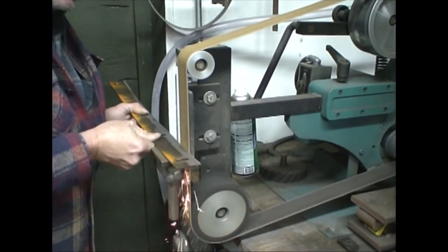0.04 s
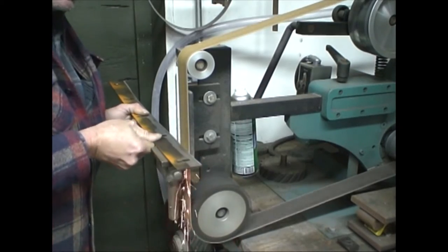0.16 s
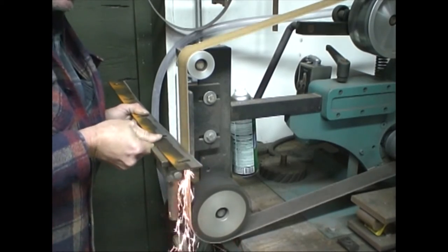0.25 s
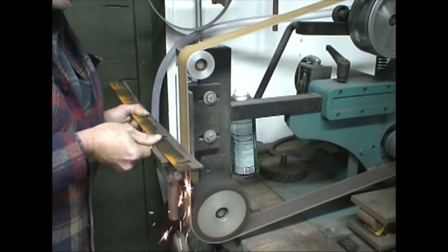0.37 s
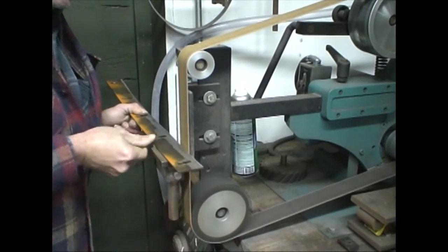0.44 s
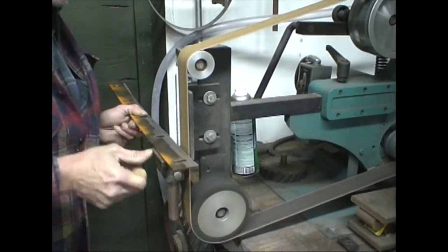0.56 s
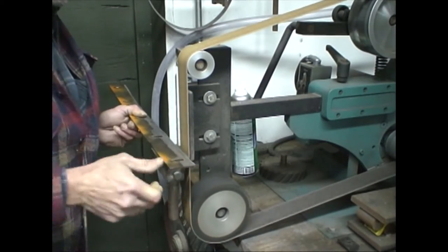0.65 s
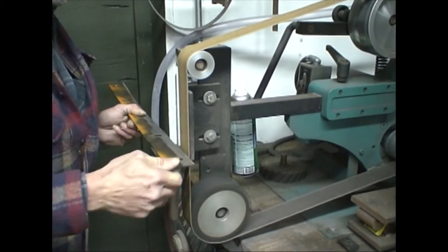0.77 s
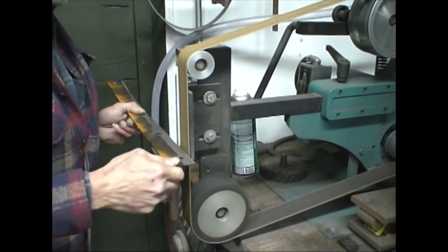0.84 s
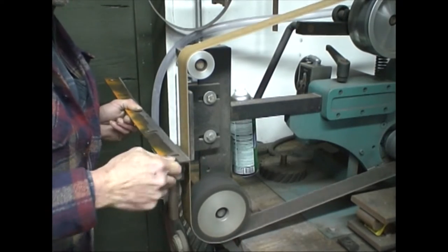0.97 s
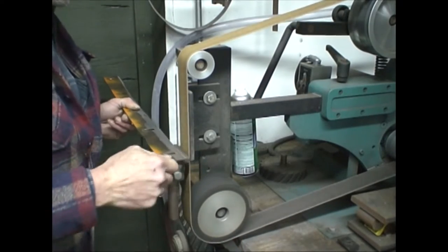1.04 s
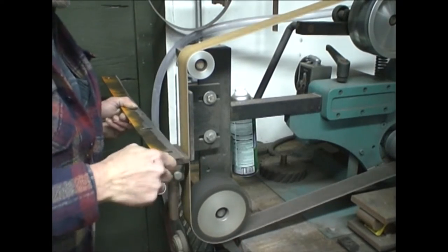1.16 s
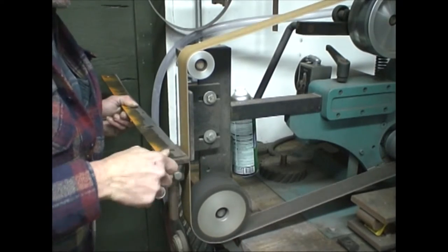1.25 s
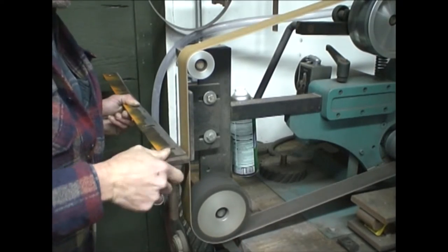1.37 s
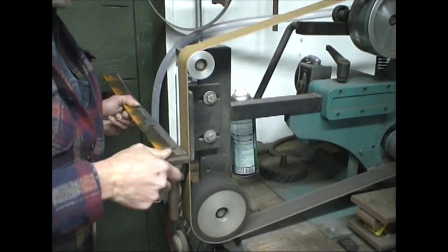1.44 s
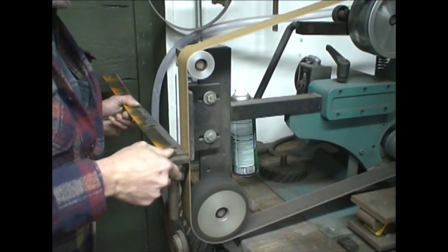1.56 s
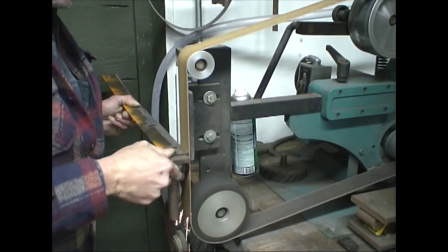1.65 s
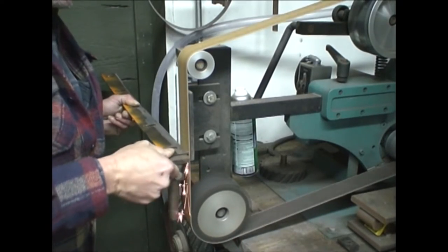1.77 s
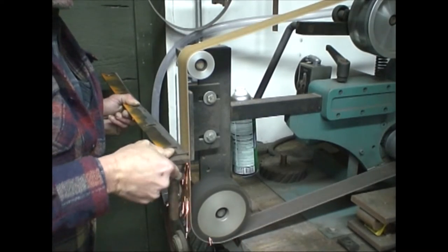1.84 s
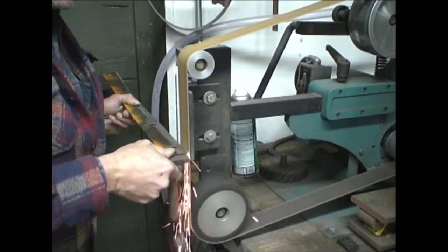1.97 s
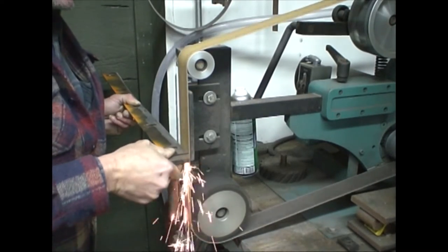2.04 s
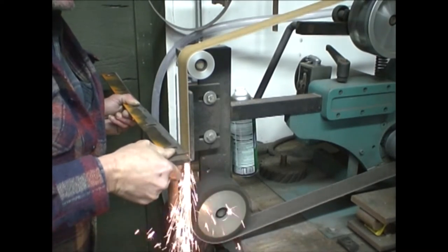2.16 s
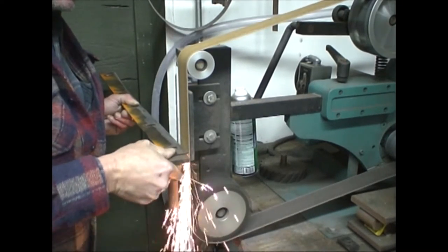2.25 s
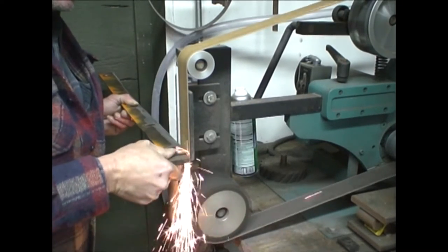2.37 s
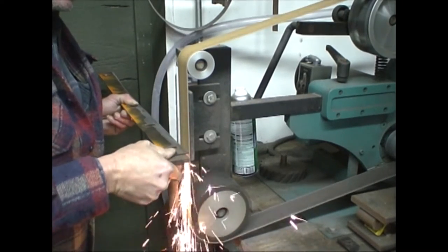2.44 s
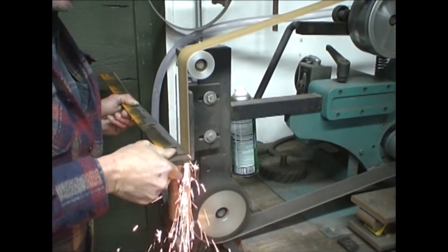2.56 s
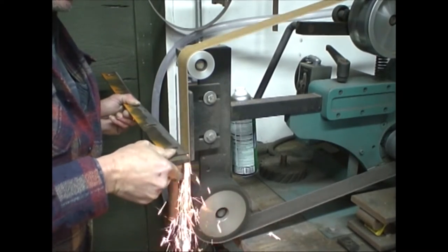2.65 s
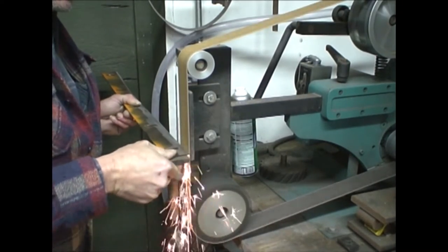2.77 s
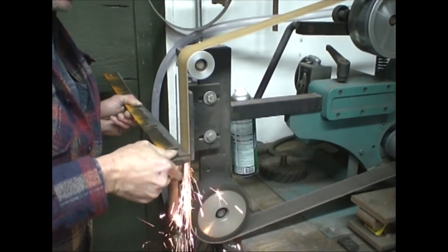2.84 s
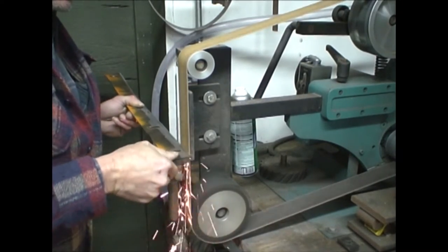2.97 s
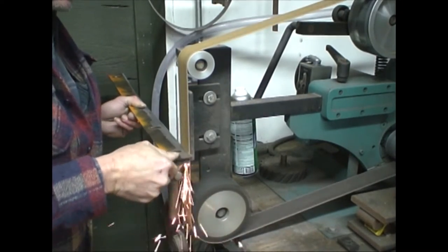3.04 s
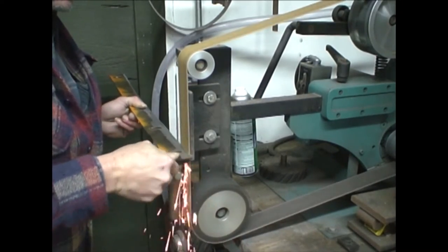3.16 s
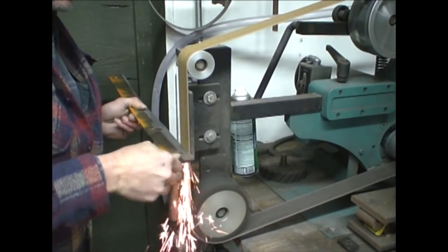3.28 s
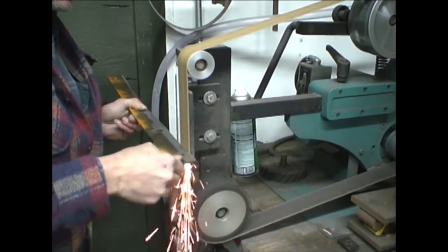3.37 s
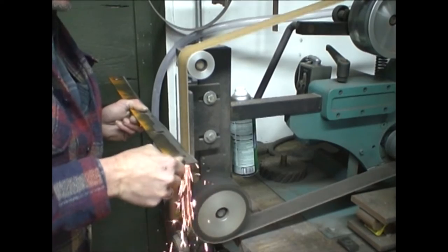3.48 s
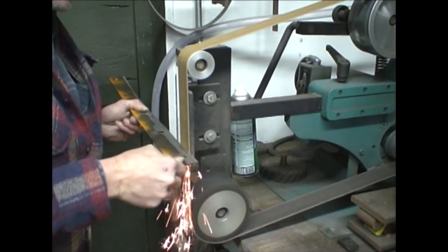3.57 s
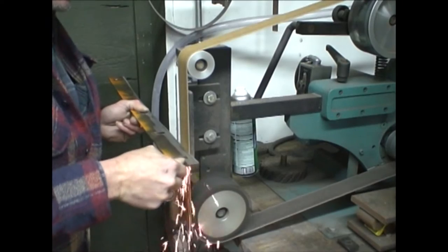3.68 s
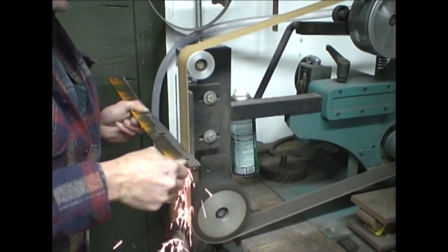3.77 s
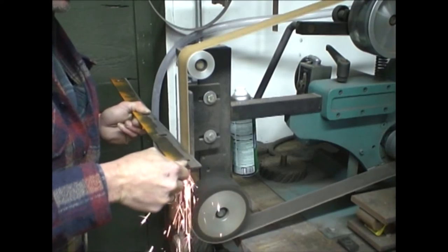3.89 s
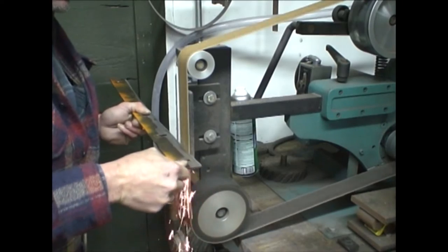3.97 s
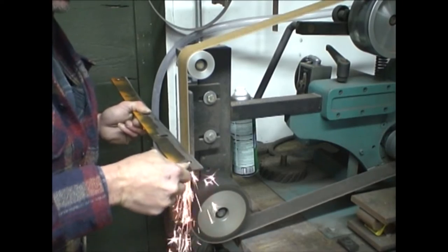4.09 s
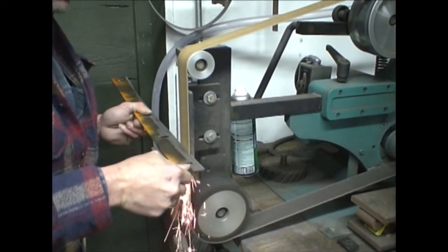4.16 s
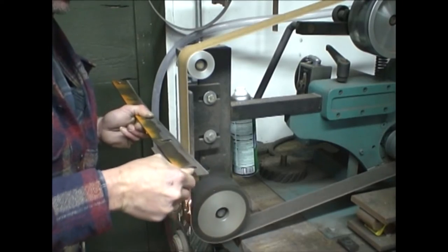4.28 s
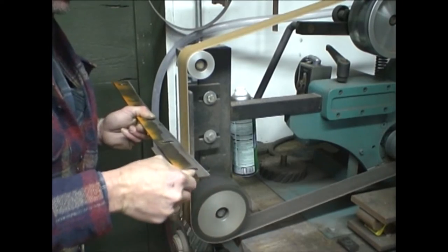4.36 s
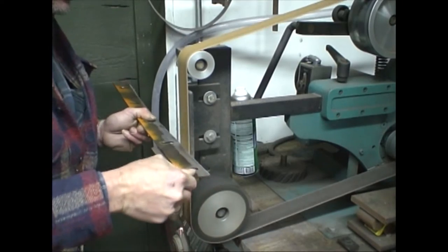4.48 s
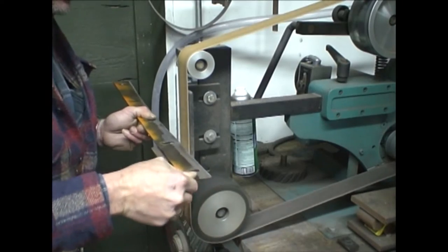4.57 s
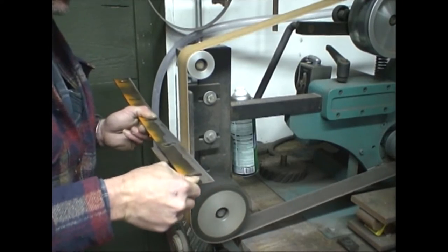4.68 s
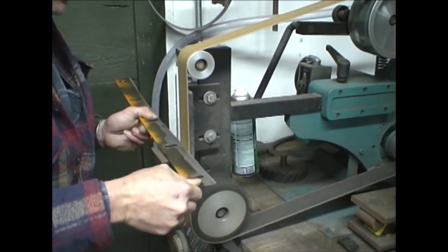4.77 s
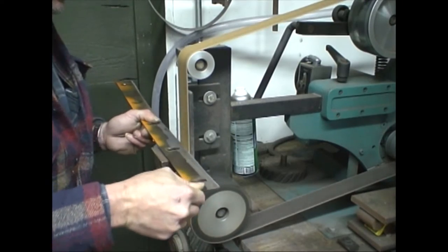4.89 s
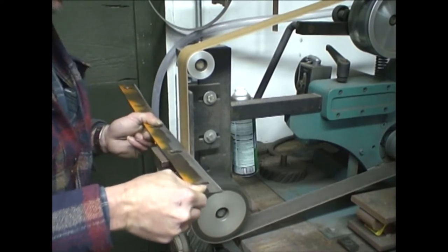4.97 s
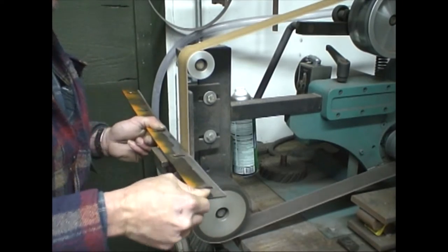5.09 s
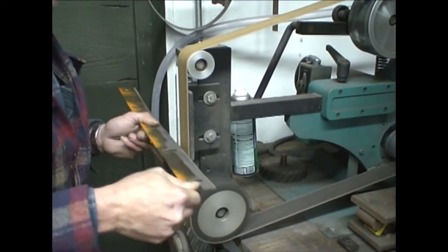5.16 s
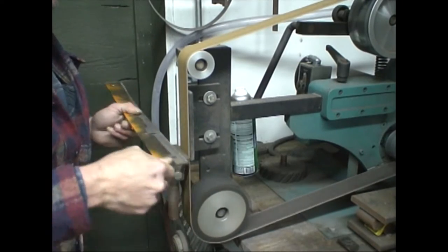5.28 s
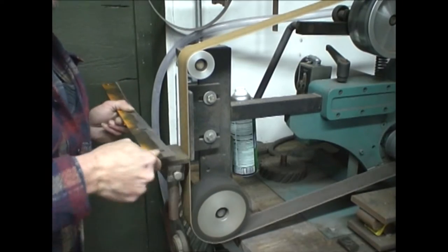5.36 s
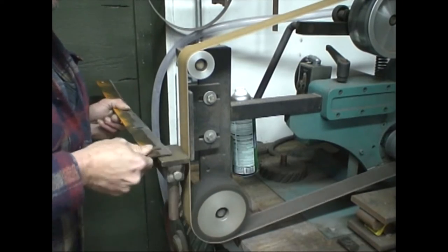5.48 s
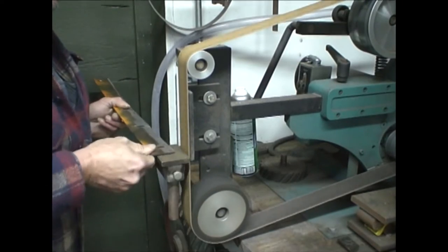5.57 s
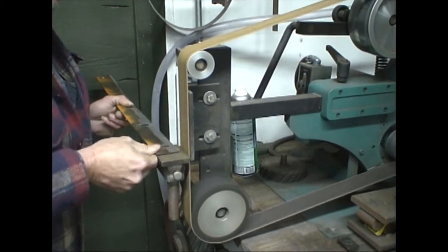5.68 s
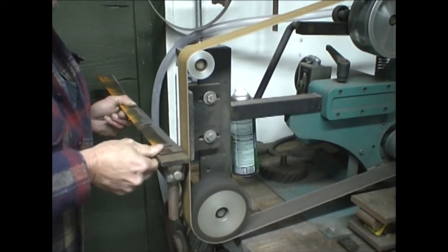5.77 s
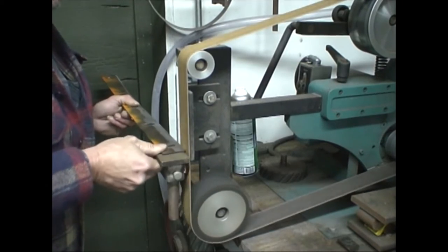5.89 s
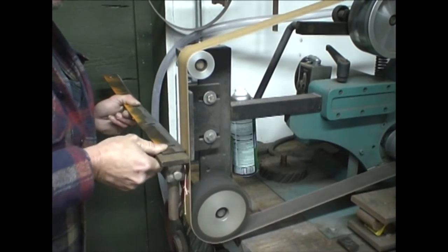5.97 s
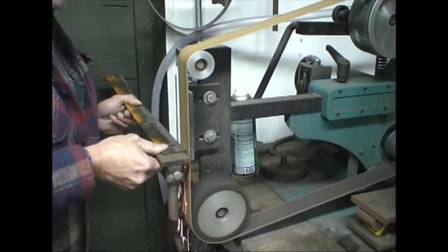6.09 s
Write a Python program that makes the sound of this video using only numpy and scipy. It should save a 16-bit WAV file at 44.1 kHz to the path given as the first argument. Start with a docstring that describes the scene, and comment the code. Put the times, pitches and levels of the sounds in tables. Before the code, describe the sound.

A belt grinder runs throughout in a small, hard-walled workshop: steady low mains hum, slightly wavering motor and bearing whines, and a broad rush of belt and wheels with a faint quick flutter. At 0 s steel is already grinding hard, a bright abrasive hiss with ringing metal, stopping near 0.45 s. The machine alone gradually swells back until about 1.6 s, when the blade touches with a brief chirping scrape. From 1.7 to 3 s the contact is light, a thin sizzle with singing tones that come and go. About 3.1 s it bites harder, dips near 3.4, then surges unevenly, becoming fierce and piercing from 4 to 5.1 s while the machine sinks behind it. It lifts at 5.15 s; the hum and rush recover. Around 5.9 s a softer grind begins, strengthening slightly and left unfinished. Close stereo microphone, short reverberant wash.

```python
"""In a small workshop a belt grinder runs: mains hum and bearing whines are wavering sines, and the rush
of belt and wheels is noise coloured by frame resonances. A steel blade is drawn across the belt three times,
the first pass already under way and the last unfinished: grit hisses as band noise and sets the blade's
modes singing as resonators, brighter the harder it is pressed. The walls return a short wash, and the
recorder's gain control makes the machine sink back under hard grinding."""
import sys
import numpy as np
from scipy import signal
from scipy.fft import rfft, irfft, next_fast_len
from scipy.io import wavfile
from scipy.ndimage import uniform_filter1d

SR = 44100
rng = np.random.default_rng(int(sys.argv[2]) if len(sys.argv) > 2 else 0)


def persist_wave(psi):
    """Save psi, clipped to +-1, as 16-bit WAV."""
    counts = np.round(np.clip(psi, -1, 1) * 32767).astype(np.int16)
    wavfile.write(sys.argv[1], SR, np.atleast_2d(counts).T)


N = 270333


def from_db(db):
    """Amplitude ratio: 20 dB for each factor of ten."""
    return 10 ** (np.asarray(db) / 20)


def rms_one(x):
    """Normalisation to unit root mean square."""
    return x / np.sqrt(np.mean(x ** 2) + 1e-20)


def in_time(rows):
    """Linear interpolation of table columns, one value a sample."""
    s, *columns = np.transpose(rows)
    return np.array([np.interp(np.arange(N) / SR, s, column) for column in columns])


def at_hz(points, hz):
    """Spectrum interpolated on a logarithmic frequency axis."""
    at, value = np.transpose(points)
    return np.interp(np.log(hz + 1), np.log(at + 1), value)


def drift(rate_hz):
    """Random fluctuation: noise slowed by two equal one-pole low-passes, rms 1."""
    step, run_in = 40, 2000   # samples, coarse steps
    r = np.exp(-2 * np.pi * step * rate_hz / SR)
    noise = rng.standard_normal(N // step + run_in + 2)
    slow = signal.lfilter([1], [1, -2 * r, r * r], noise)[run_in:]
    return np.interp(np.arange(N) / step, np.arange(len(slow)), rms_one(slow))


def spread(mid_side, side_table, lean_table):
    """Mid-side stereo: frequency sets the width and the level balance of left and right."""
    size = next_fast_len(N)
    hz = np.arange(size // 2 + 1) * SR / size
    mid, side = rfft(mid_side, size)
    side = side * from_db(at_hz(side_table, hz))
    lean = from_db(at_hz(lean_table, hz) / 2)   # half of the difference to each ear
    return irfft([(mid + side) * lean, (mid - side) / lean], size)[:, :N]


def belt_pattern(turns_per_s=7.63):
    """Periodic modulation: splice and worn patches come round with every turn of the belt."""
    turn = turns_per_s * np.arange(N) / SR
    patches = rng.standard_normal(32)
    return np.interp(turn % 1, np.linspace(0, 1, 33), np.append(patches, patches[0]))


def wavering_tone(hz, waver_hz):
    """Frequency modulation by chance: the more the pitch strays, the more the level flickers."""
    phase = 2 * np.pi * (hz * np.arange(N) + waver_hz * np.cumsum(drift(6.1))) / SR
    flicker = from_db(2.9 * np.tanh(waver_hz / 3) * drift(4.2))
    # mid, and a weaker side a quarter cycle away
    return np.sqrt(2) * flicker * np.array([np.sin(phase), 0.25 * np.cos(phase)])


def motor_and_bearings():
    """Rotating parts radiate line spectra: steady tones with slightly wandering pitch."""
    # pitches of motor and bearings: (frequency [Hz])
    tone_hz = [59.5, 120, 239, 418, 836, 1314, 1550, 2783, 3262, 3521, 4100, 4462, 4753, 4959]
    # each of these tones: (level re machine level [dB], rms pitch waver [Hz])
    tones = [(-23.5, 1.3), (-0.2, 0.041), (-18.5, 2.92), (-11, 3.05), (-12, 1.2), (-17, 7.65), (-17, 8.06),
             (-23, 8.4), (-16.5, 8.55), (-25, 8.6), (-19, 11.1), (-16.5, 8.8), (-22, 7.2), (-30, 7.3)]
    return sum(from_db(level_db) * wavering_tone(hz, waver_hz)
               for hz, (level_db, waver_hz) in zip(tone_hz, tones))


def belt_rush(belt, level_db=8):
    """Turbulence and friction give broadband noise, which the frame's resonances colour."""
    # noise of belt, wheels and fan: (frequency [Hz], relative spectral density [dB])
    rush_colour = [(20, -31), (45, -33), (90, -21.5), (130, -19), (160, -16.5), (364, -10), (900, -18.5),
                   (1900, -18), (3300, -16), (4800, -16.5), (7000, -18), (9000, -19.5), (13300, -18),
                   (16000, -25)]
    # resonances of frame and guards: (frequency [Hz], width [Hz], lift [dB])
    frame = [(188, 40, 4.5), (342, 22, 3.5), (677, 82, 4), (1244, 130, 4), (3440, 87, 3), (4810, 140, 5),
             (6250, 210, 1.5), (10200, 290, 1.5)]
    hz = np.arange(N // 2 + 1) * SR / N
    colour_db = at_hz(rush_colour, hz)
    for top_hz, width_hz, lift_db in frame:
        colour_db += lift_db / (1 + (2 * (hz - top_hz) / width_hz) ** 2)
    white = rfft(rng.standard_normal((2, N)))
    rush = rms_one(irfft(white * from_db(colour_db), N))
    return rush * from_db(level_db + 0.19 * belt + 0.46 * drift(24))


def machine(belt, machine_db=-32):
    """Superposition of line spectrum and broadband rush, at a steady running level."""
    # stereo width: (frequency [Hz], gain of the side signal [dB])
    machine_side = [(30, 0), (48, -4), (60, -11), (120, -8.5), (200, -17), (380, -12.5), (700, -7.5),
                    (1290, -8.5), (2380, -9), (4400, -5), (7000, -5), (10400, -3), (11300, -4),
                    (11800, -22), (16000, -30)]
    # stereo balance: (frequency [Hz], left re right [dB])
    machine_lean = [(60, -1.0), (110, -1), (200, -1.5), (380, -3.0), (700, -4.5), (1290, -3.0),
                    (2380, -0.5), (4400, -1.5), (8120, -2.5), (15000, -3)]
    both = motor_and_bearings() + belt_rush(belt)
    return from_db(machine_db) * spread(both, machine_side, machine_lean)


def contact(touch_s=0.039, lift_s=0.067):
    """Pressure drives the friction sound: hiss amplitude and ring levels, silent off the belt."""
    # each pass from touch to lift: (time [s], pressure as control level of the grit hiss [dB])
    passes = [
        [(-.2, -18), (0.05, -10.5), (0.2, -11.5), (0.33, -13.5), (0.452, -9)],
        [(1.575, -29), (1.65, -23), (1.7, -23), (1.85, -23), (2.0, -22), (2.17, -22), (2.3, -21.5), (2.5, -21),
         (2.6, -21), (2.8, -22), (2.95, -22), (3.08, -15.5), (3.2, -14), (3.38, -21.5), (3.47, -13),
         (3.58, -12.5), (3.7, -12), (3.75, -10), (3.79, -14), (3.83, -15), (3.87, -11.5), (4.0, -9),
         (4.12, -12), (4.24, -13), (4.42, -9.5), (4.55, -7), (4.66, -9), (4.78, -8.5), (4.9, -9.5), (5.0, -8.5),
         (5.06, -11.5), (5.142, -14)],
        [(5.88, -24), (6.0, -24.5), (6.13, -18.5), (6.3, -20)],
    ]
    # rings of heel, edge and tip: (level re hiss at middling pressure [dB], share of a pressure change followed)
    rings = [(-9.5, 0.027), (-5, 1), (-5, 1)]
    middling_db = -15
    heel_late_db, heel_settles_s = -14, 0.21   # the heel starts weak after each touch
    t, touch, late_db = np.arange(N) / SR, np.zeros(N), np.zeros(N)
    for rows in passes:
        on, off = rows[0][0], rows[-1][0]
        ramp = np.minimum((t - on) / touch_s, (off - t) / lift_s)
        touch += np.clip(ramp, 0, 1) ** 2
        if on > 0:
            late_db += heel_late_db * np.exp(-abs(t - on) / heel_settles_s) * (t > on)
    hiss_db, = in_time([row for rows in passes for row in rows])
    heel, edge, tip = [level_db + (follows - 1) * (hiss_db - middling_db) for level_db, follows in rings]
    # the fourth control is the hiss itself, 0 dB re hiss
    return touch * from_db(hiss_db), np.array([heel + late_db, edge, tip, 0 * hiss_db])


def ring_db(hz, rings_db):
    """Excitation by frequency: a blend of the heel, edge, tip and hiss controls."""
    places = np.log([2580, 5600, 10400, 12500])   # Hz where each control acts alone
    weights = np.array([np.interp(np.log(hz), places, one) for one in np.eye(4)])
    return weights @ rings_db


def blade(grains, rings_db):
    """Modal resonance: grit noise excites each mode, which swells and fades as the contact wanders."""
    # pitches of the blade's modes: (frequency [Hz])
    blade_hz = [1870, 1985, 2235, 2770, 2935, 3768, 4200, 5050, 5190, 5430, 5770, 5857, 6040, 6820, 7175,
                7550, 7900, 8540, 9100, 9350, 10372, 10900, 11030, 11420, 11720, 12380, 12900, 13440, 14280,
                15620]
    # each of these modes: (width [Hz], level re its ring [dB])
    blade_modes = [(50, -17.5), (35, -17.5), (30, -17), (50, -12.5), (40, -16), (46, -26), (60, -24),
                   (90, -20), (110, -16), (50, -24), (40, -18), (50, -25), (50, -16.5), (90, -11),
                   (50, -11.5), (60, -13), (80, -18.5), (80, -22), (100, -16), (90, -14), (130, -13),
                   (120, -17), (110, -17.5), (60, -15.5), (90, -13), (110, -27), (80, -34), (90, -17),
                   (120, -20), (150, -14)]
    # moments when the nearest mode sings out or dips: (middle [s], length [s], mode [Hz], lift [dB])
    singing = [(.27, .1, 5050, 4), (1.8, .08, 3768, 6), (1.647, 0.089, 2935, 17), (2.16, 0.62, 5050, 15),
               (2.272, 0.45, 5740, 12), (2.33, 0.5, 7900, 15), (2.3, 0.34, 7175, 9), (2.1, 0.6, 1870, 7),
               (2.4, 0.22, 11420, 11), (2.78, 0.34, 6820, 7), (3.3, 0.34, 2235, 2.5),
               (3.44, 0.16, 6040, -1), (3.846, 0.15, 5190, 13), (3.9, 0.67, 1870, 8), (4.06, 0.13, 5190, 4),
               (3.87, .2, 10372, 7), (4.2, 0.4, 10372, 10), (.295, .3, 11720, -6), (4.267, 0.13, 11720, 7),
               (5.06, .16, 11720, 5), (2.8, 0.36, 2770, -1), (4.26, 0.2, 5857, 17), (4.49, 0.29, 1985, 10),
               (4.83, 0.34, 10372, 7), (4.2, .15, 10900, 12), (4.953, 0.18, 11030, 12), (2, 0.41, 2935, 8),
               (2.2, 0.44, 6820, 2), (2.45, .2, 5430, 12), (4.5, .2, 12380, 6), (4.4, .1, 12900, 6)]
    step = 8   # samples between swell values
    t, out = np.arange(0, N, step) / SR, 0
    for k, (hz, (width_hz, level_db)) in enumerate(zip(blade_hz, blade_modes)):
        r = np.exp(-np.pi * width_hz / SR)
        poles = [1, -2 * r * np.cos(2 * np.pi * hz / SR), r * r]
        mode = signal.lfilter([1, 0, -1], poles, grains[k % 2])
        swell_db = (1.7 * drift(4.9) + 2.5 * drift(30))[::step]
        for middle, length, mode_hz, lift_db in singing:
            nearest = np.argmin(abs(np.log(mode_hz / np.array(blade_hz))))
            if nearest == k:
                swell_db += lift_db * np.exp(-(2 * (t - middle) / length) ** 2)
        swell_db = np.repeat(swell_db, step)[:N]
        out = out + rms_one(mode) * from_db(level_db + ring_db(hz, rings_db) + swell_db)
    return out


def grit_hiss(grains, rings_db):
    """Countless random impacts sum to noise: bands of it follow pressure and broad scrapes."""
    # colour before the ring controls act: (frequency [Hz], relative spectral density [dB])
    grit = [(500, -15), (1000, -4.5), (1700, -2.5), (2800, 4), (4200, 4.5), (6500, -0.5), (8200, 1.5),
            (9700, 3), (10800, 4), (11900, 4.5), (13200, 2), (14600, -1), (16000, -1)]
    # surges or dips of the scrape: (middle [s], length [s], centre [Hz], width [octaves], lift [dB])
    scrapes = [(0.27, 0.17, 4800, 0.6, 4), (1.645, 0.068, 3330, 0.43, 11.5), (1.66, .06, 11500, .4, 1.5),
               (2.26, 0.6, 6300, 0.5, 9), (2.1, 0.52, 3000, 0.46, 2.5), (2.962, 0.073, 3300, .9, 2),
               (3.39, 0.14, 2900, 1, 5), (3.848, 0.098, 4400, .5, 3), (4.198, 0.23, 6400, 0.52, 7.5),
               (4.55, 0.78, 9900, 0.27, 4.5), (4.403, 0.27, 11500, 0.36, 4), (4.9, 0.3, 11800, 0.28, -2.5),
               (4.13, 0.46, 2800, 0.66, 2.5), (5.0, 0.37, 4500, .8, 1.5), (4.97, 0.18, 13000, .4, 1.5)]
    edges_hz = np.linspace(500 ** .3, 17000 ** .3, 19) ** (1 / .3)
    step = 16   # samples between scrape values
    t, out = np.arange(0, N, step) / SR, 0
    for k, (low, high) in enumerate(zip(edges_hz, edges_hz[1:])):
        hz = np.sqrt(low * high)
        band_pass = signal.butter(2, [low, high], "band", fs=SR, output="sos")
        band = signal.sosfilt(band_pass, grains[k % 2])
        scrape_db = np.zeros(len(t))
        for middle, length, centre_hz, octaves, lift_db in scrapes:
            in_pitch = (2 * np.log2(hz / centre_hz) / octaves) ** 2 / 2
            scrape_db += lift_db * np.exp(-in_pitch - (2 * (t - middle) / length) ** 2)
        level_db = at_hz(grit, hz) + 4.5 + np.repeat(scrape_db, step)[:N] + ring_db(hz, rings_db)
        flutter_db = 0.64 * drift(3.8) + 0.93 * drift(23)
        out = out + band * from_db(level_db + flutter_db)
    return out


def tool_rest(heel_db, follows=1.24):
    """Coupled vibration: the rest hums while the heel leans on it; hard pressure mutes the hum."""
    # pitches of the rest: (frequency [Hz])
    rest_hz = [701, 1405, 1661]
    # each of these pitches: (level re hiss with the heel control at 0 dB [dB])
    rest_db = [-15.5, -18.5, -18.5]
    return sum(wavering_tone(hz, waver_hz=2.49) * from_db(level_db + follows * heel_db)
               for hz, level_db in zip(rest_hz, rest_db))


def grinding(belt):
    """Friction excitation: grains cutting steel are heard direct and through blade and rest."""
    # wheel and motor shake the blade against the grit: (frequency [Hz], rms swing [dB])
    shake = [(45.7, .2), (120, .25)]
    # stereo width: (frequency [Hz], gain of the side signal [dB])
    grind_side = [(700, -12.5), (1290, -9), (2380, -12.5), (4400, -8), (7000, -5.5), (10400, -4.5),
                  (11300, -6), (11700, -42), (16000, -52)]
    # stereo balance: (frequency [Hz], left re right [dB])
    grind_lean = [(60, -0.5), (110, -1.0), (200, -3), (380, -2.5), (700, -5), (1290, -0.5), (2380, -1),
                  (4400, 1), (8120, -0.4), (15000, 0.6)]
    hiss, rings_db = contact()
    grains = rng.standard_normal((2, 2, N))
    # reversed in time, the same noise is unrelated to the direct hiss
    sound = blade(grains[..., ::-1], rings_db) + grit_hiss(grains, rings_db) + tool_rest(rings_db[0])
    shake_db = sum(swing_db * wavering_tone(hz, waver_hz=0.98)[0] for hz, swing_db in shake)
    together_db = 0.49 * drift(18) + 0.29 * belt + shake_db   # moves every part of the grinding alike
    return spread(sound * hiss * from_db(together_db), grind_side, grind_lean)


def workshop(x, t60_s=0.58, wash_db=-8.5):
    """Reverberation: walls and benches return an exponentially dying wash, alike on both sides."""
    t = np.arange(SR // 2) / SR
    wash = rng.standard_normal(len(t)) * from_db(-60 * t / t60_s) * (t > .004)
    # energy re direct sound, set ahead of the band-pass
    wash = wash / np.sqrt(np.sum(wash ** 2)) * from_db(wash_db)
    middle_band = signal.butter(1, [910, 10900], "band", fs=SR, output="sos")
    wash = signal.sosfilt(middle_band, wash)
    return x + signal.fftconvolve(x, wash[None], axes=1)[:, :N]


def gain_control(x):
    """Feed-forward compression: loud treble cuts the gain quickly, and it recovers at a steady rate."""
    sense_hz, ceiling_db, cut_share = 7560, -22.5, 0.96   # share of the excess that is taken off
    attack_s, recovery_db_per_s = 0.019, 32.5
    memory_s, memory_share = 0.5, 0.26   # after long loud stretches part of the cut lingers
    step = 220   # samples
    dt = step / SR
    high_pass = signal.butter(2, sense_hz, "high", fs=SR, output="sos")
    treble = signal.sosfilt(high_pass, x.mean(axis=0))
    power = uniform_filter1d(treble ** 2, size=1800)[::step]
    over_db = np.maximum(10 * np.log10(power + 1e-12) - ceiling_db, 0) * cut_share
    cut_db = np.zeros(len(over_db))
    now = memory = over_db[0]
    for k, wanted in enumerate(over_db):
        memory += (now - memory) * dt / memory_s
        wanted = max(wanted, memory_share * memory)
        if wanted > now:
            now = now + (wanted - now) * min(dt / attack_s, 1)
        else:
            now = max(wanted, now - recovery_db_per_s * dt)
        cut_db[k] = now
    return x * from_db(-np.interp(np.arange(N), step * np.arange(len(cut_db)), cut_db))


def scene():
    """Superposition: machine and grinding share the same belt and room."""
    belt = belt_pattern()
    return workshop(machine(belt) + grinding(belt))


def record(dry):
    """Band limitation: after the gain control a steep low-pass removes the top."""
    low_pass = signal.ellip(14, .3, 65, 15740, fs=SR, output="sos")   # ripple dB, stop dB, cutoff Hz
    return signal.sosfilt(low_pass, gain_control(dry))


dry = scene()
out = record(dry)
persist_wave(out)
```